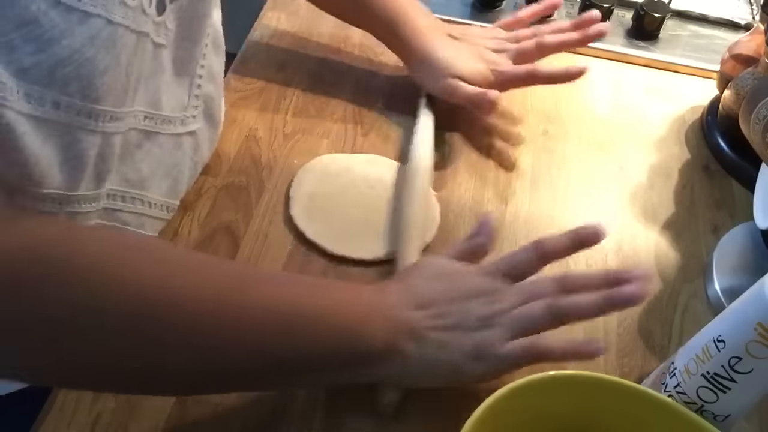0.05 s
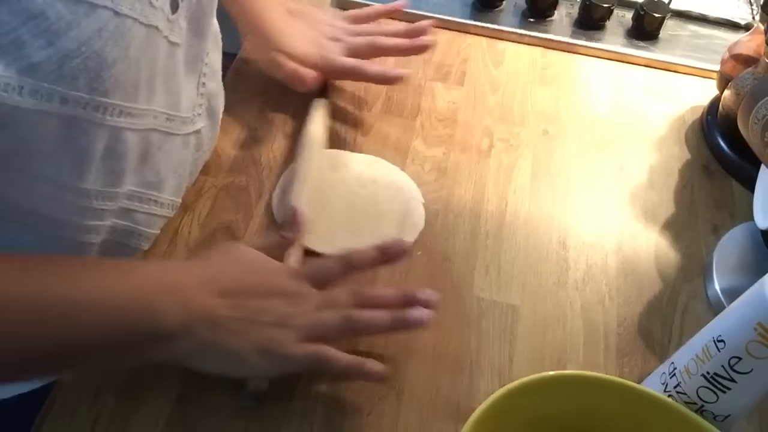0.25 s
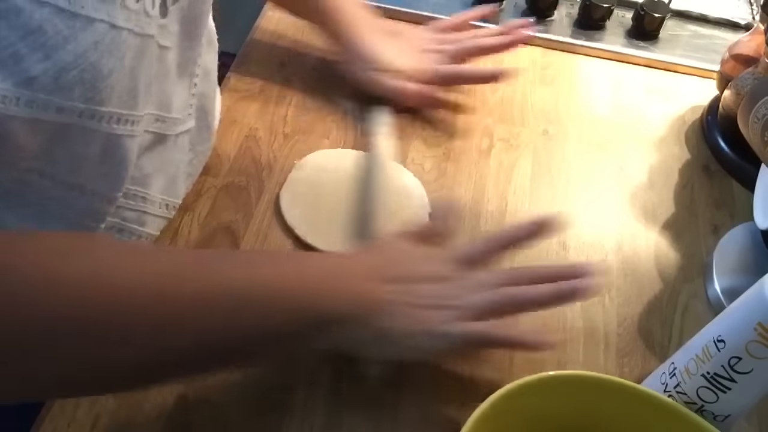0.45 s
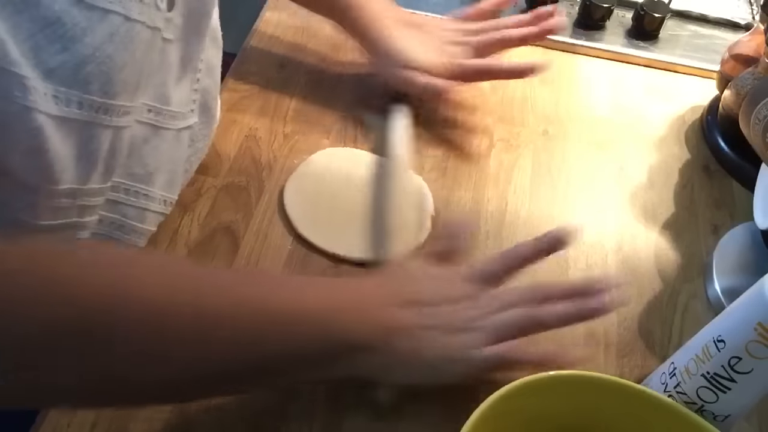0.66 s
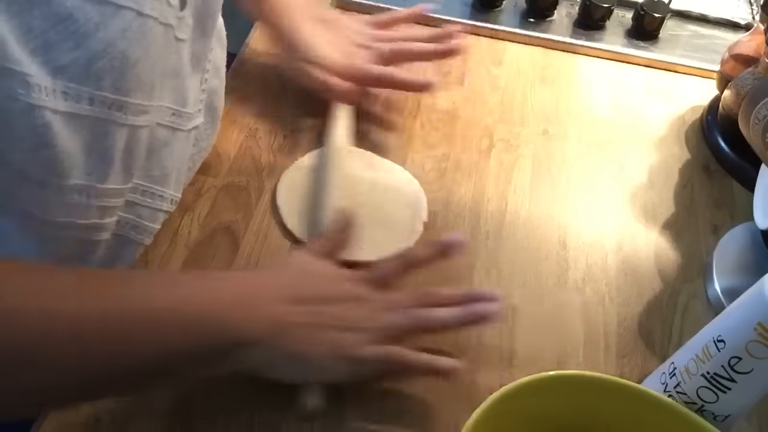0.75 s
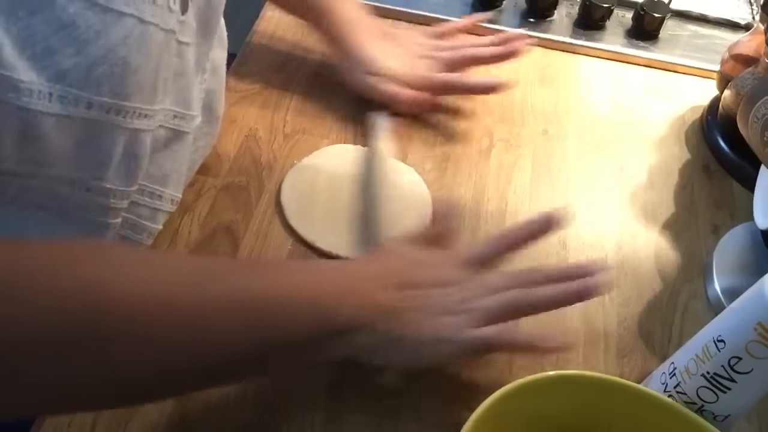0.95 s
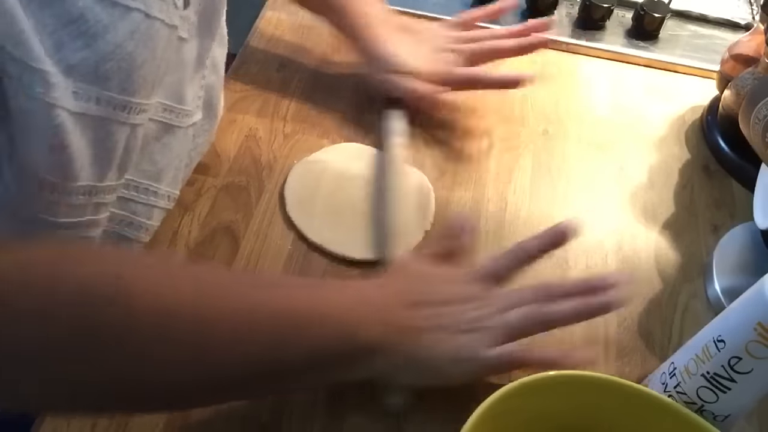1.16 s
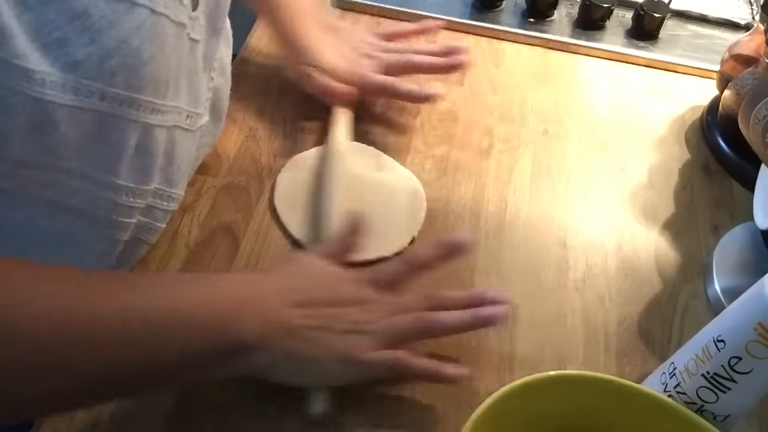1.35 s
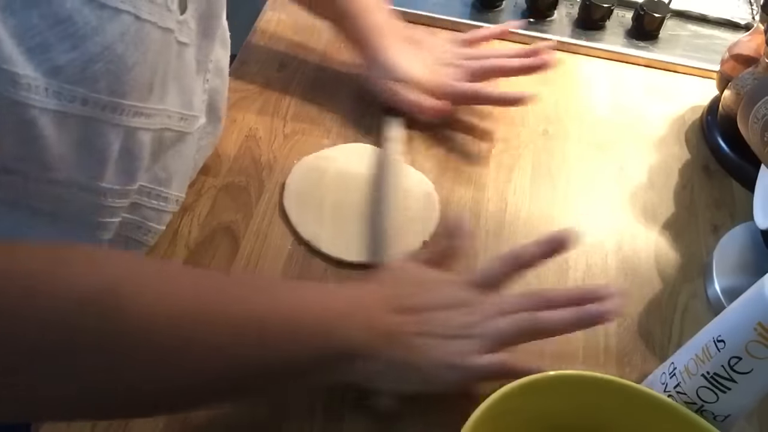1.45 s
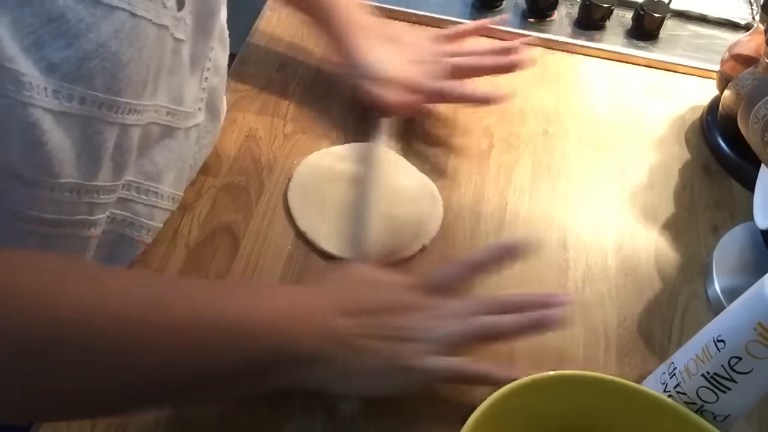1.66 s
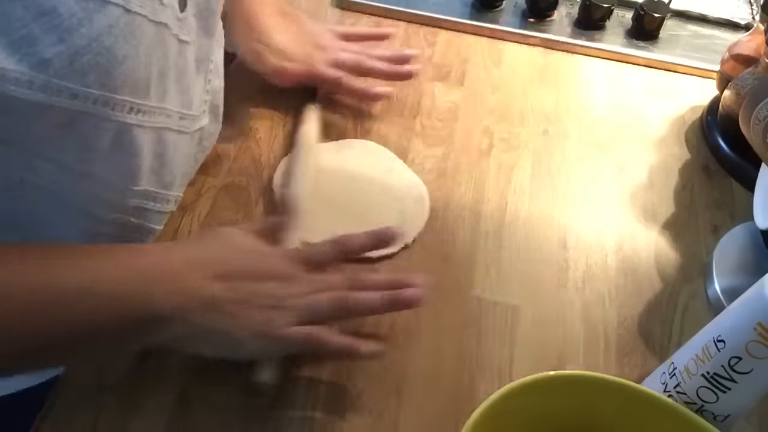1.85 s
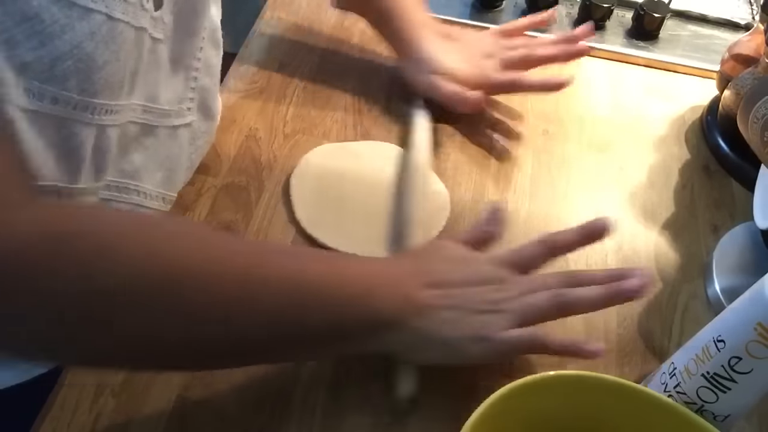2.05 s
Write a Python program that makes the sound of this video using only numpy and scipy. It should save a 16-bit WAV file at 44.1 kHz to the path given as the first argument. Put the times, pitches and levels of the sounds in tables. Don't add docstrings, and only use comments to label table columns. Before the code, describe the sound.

Rolling pin on dough: sharp wooden knocks, then softer ones, palms rubbing along the wood

```python
import sys
import numpy as np
from scipy import signal
from scipy.io import wavfile

SR = 44100
rng = np.random.default_rng(int(sys.argv[2]) if len(sys.argv) > 2 else 0)


def boost(x):
    u = np.asarray(x, float) / 20
    return 10 ** u


def put_to_file(sound):
    columns = np.atleast_2d(sound).T
    safe = np.clip(columns, -1, 1)
    whole_steps = np.round(safe * 32767)
    wavfile.write(sys.argv[1], SR, whole_steps.astype(np.int16))


N = 92610

# (time [s], pin level [dB], board level [dB], crack level [dB], chatter length [s])
KNOCKS = [
    (-.07, -29, -37, 9, 0.006),
    (.2107, -23.5, -33.5, 2, 0.0015),
    (.4834, -17, -30.5, -10, 0.00076),
    (.7652, -36, -30, -28, 0.019),
    (1.0595, -35.5, -34.5, -6.5, 0.014),
]
# (delay [s], level on bare wood [dB], level through dough [dB])
REBOUNDS = [(.008, -43, -21.5), (.026, -24, -15.5), (0.047, -37, -65)]
# (frequency [Hz], time to fade by 60 dB [s])
PIN_MODES = [(1005, 0.04), (1600, 0.021), (1800, 0.013), (2000, 0.014), (2480, 0.0096), (2790, 0.014),
             (2980, 0.016), (3290, 0.018), (3780, 0.018), (4020, 0.013), (5220, 0.011), (5670, 0.019),
             (6850, 0.0062), (7450, .012)]
# (frequency [Hz], time to fade by 60 dB [s])
BOARD_MODES = [(150, 0.32), (203, 0.27), (255, 0.14), (350, 0.086), (425, 0.11), (505, 0.17), (575, 0.085),
               (865, 0.1), (1340, 0.037)]
PIN_SHARE = [(-9.5, -4.5, -12, -5), (-0.5, -1, -4.5, -1.5), (6, 4, -18, -2.5), (4.5, 2.5, -7.5, -4.5),
             (4.5, -6, 2.5, 1.5), (3.5, 0.5, 1, -3), (4.5, -0.5, -2.5, -3.5), (-11, -18, -10.5, -16),
             (0, -6.5, -4, -6), (-26, -4, -6, -9), (-8, -9.5, -15, -41), (-4, -17.5, -5.5, -10),
             (-6, -40, -15, -16), (-6.5, -41, -14, -26)]
BOARD_SHARE = [(-12, -13, -19, -48), (-3, -6.5, -4.5, -3.5), (-4.5, -2.5, -8.5, -5), (4, 2.5, 3.5, -8.5),
               (5, 6.5, -2.5, 5.5), (-0.5, -1.5, -2.5, 1.5), (5.5, 7.5, 2, 6.5), (5.5, 2, 11, 11.5),
               (-20, -26, -14, -16)]
# (time [s], level [dB], pitch [Hz], time to fade by 60 dB [s])
THUDS = [(.003, -51, 95, 0.067), (0.083, -77, 100, 0.06), (.108, -72.5, 670, .08),
         (1.288, -46, 43.6, 0.035), (1.37, -69.5, 640, 0.044), (1.735, -69, 199, 0.15),
         (1.863, -49.5, 144, 0.03), (1.861, -57.5, 393, 0.013), (1.959, -54.5, 374, 0.027),
         (1.959, -56.5, 574, 0.015), (1.979, -53, 175, 0.041), (2.04, -72, 51.6, 0.071)]
# (middle [s], length [s], hiss level [dB], pin ring level [dB])
STROKES = [(.01, 0.27, -65, -87), (0.241, 0.15, -55.5, -82), (0.528, 0.19, -60, -60),
           (0.793, 0.18, -57.5, -71), (1.064, 0.23, -67.5, -66.5), (1.274, 0.087, -104, -62.5),
           (1.309, 0.28, -70.5, -70.5), (1.52, 0.33, -68, -76), (1.796, 0.34, -65.5, -71),
           (1.987, 0.083, -77, -65.5), (2.063, .22, -66, -69.5)]
# (frequency [Hz], level per Hz [dB])
RUB_HISS = [(150, -1), (350, 7), (700, -5), (1300, -1.5), (2700, -6.5), (5500, -11.5), (9000, -18),
            (15500, -17.5)]
# (frequency [Hz], level [dB])
RUB_MODES = [(2480, 1), (2640, -1), (2810, -1), (3050, -7.5), (3500, -4.5), (3780, -4), (4010, 0.5),
             (5250, -16.5), (5600, 0.5), (6890, -4)]
# (frequency [Hz], time to fade by 60 dB [s], echo level [dB])
KITCHEN = [(100, 0.22, -3.5), (417, 0.3, -1.5), (975, 0.32, 0.5), (1850, 0.29, -1), (3900, 0.25, -6),
           (6700, 0.27, -4.5), (13000, 0.33, 4.5)]
# (frequency [Hz], level per Hz [dB])
AIR = [(15, -37), (25, -5), (69, 2.5), (359, -7.5), (722, -12), (2560, -13), (4870, -14), (5430, -13),
       (15500, -26.5)]

LEAD = 4410

SOFT_FROM_S = .006
CONTACTS_PER_S, CHATTER_DB = (1500, 3500), (-12.5, 0.5)
PUSH_S, SOFT_ATTACK_S = (0.00051, 0.0005), .0025
RING_SHARE = (0.91, 0.69)
KNOCK_ECHO_DB, BOARD_ECHO_DB = (1.5, -1.5), -4


def at_hz(points, hz):
    points = np.array(points)
    return np.interp(np.log(hz), np.log(points[:, 0]), points[:, 1])


def rms_one(x):
    return x / np.sqrt(np.mean(x ** 2) + 1e-20)


def filtered(x, order, hz, kind):
    return signal.sosfilt(signal.butter(order, hz, kind, fs=SR, output="sos"), x)


def drift(rate_hz):
    r = np.exp(-80 * np.pi * rate_hz / SR)
    slow = signal.lfilter([1], [1, -2 * r, r * r], rng.standard_normal(N // 40 + 2002))
    slow = slow[2000:]
    return np.interp(np.arange(N) / 40, np.arange(len(slow)), rms_one(slow))


def ring(clicks, hz, t60):
    r = boost(-60 / (t60 * SR))
    w = 2 * np.pi * hz / SR
    return signal.lfilter([0, np.sin(w)], [1, -2 * r * np.cos(w), r * r], clicks + 1e-18)


def ring_body(force, modes, shares, spot, ring_share):
    out = 0
    for k, ((hz, t60), share_db) in enumerate(zip(modes, shares)):
        sign = (-1) ** k
        out = out + sign * boost(share_db[spot]) * ring(force, hz, t60 * ring_share)
    return out


def bands(size):
    edges = 22 * 2 ** np.arange(0, 9.6, .5)
    white = rng.standard_normal((2, size))
    return [(np.sqrt(low * high), filtered(white[k % 2], 2, [low, high], "band"))
            for k, (low, high) in enumerate(zip(edges, edges[1:]))]


def hiss(spectrum, flicker_db):
    return rms_one(sum(boost(at_hz(spectrum, hz) + flicker_db * drift(15)) * band for hz, band in bands(N)))


def knock_forces(chatter_s, soft):
    span = SR // 2
    t = np.arange(span) / SR
    hits = rng.random(span) < CONTACTS_PER_S[soft] / SR
    touch = hits * rng.uniform(-1, 1, span) * np.exp(-(t / chatter_s) ** (1 + 2 * soft))
    touch *= boost(CHATTER_DB[soft])
    if soft:
        touch *= 1 - np.exp(-t / SOFT_ATTACK_S)
    touch[0] = 1 - soft
    push = t * np.exp(-t / PUSH_S[soft]) / (PUSH_S[soft] ** 2 * SR)
    first = np.array([touch, push])
    force = first.copy()
    for delay_s, *level_db in REBOUNDS:
        lag = int(delay_s * SR)
        force[:, lag:] += boost(level_db[soft]) * first[:, :span - lag]
    return force


def crack(touch):
    fade = np.exp(-np.arange(800) / SR / 0.0018)
    burst = filtered(rng.standard_normal(800) * fade, 2, [1500, 5190], "band")
    return signal.fftconvolve(touch, burst)[:len(touch)]


def knocks():
    out = np.zeros(N + LEAD + SR)
    for n, (s, pin_db, board_db, crack_db, chatter_s) in enumerate(KNOCKS):
        soft = int(chatter_s > SOFT_FROM_S)
        spot = max(n - 1, 0)
        touch, push = knock_forces(chatter_s, soft)
        pin = ring_body(touch, PIN_MODES, PIN_SHARE, spot, RING_SHARE[soft])
        board = ring_body(push, BOARD_MODES, BOARD_SHARE, spot, RING_SHARE[soft])
        pin = boost(pin_db - 7.5) * (pin + boost(crack_db + 8) * crack(touch))
        pin = filtered(pin, 3, 7660, "low")
        board = boost(board_db - 4.5) * board
        echo = boost(KNOCK_ECHO_DB[soft]) * kitchen(pin + boost(BOARD_ECHO_DB) * board)
        i = int(s * SR) + LEAD
        out[i:i + len(pin)] += pin + board + echo
    return filtered(out[:N + LEAD], 4, 135, "high")


def thuds():
    out = np.zeros(N + LEAD)
    for s, db, hz, t60 in THUDS:
        push = np.zeros(N + LEAD)
        push[int(s * SR) + LEAD] = boost(db + 8.5)
        out += ring(filtered(push, 1, [0.74 * hz, 1.3 * hz], "band"), hz, t60)
    return out


def rub():
    t = np.arange(N) / SR
    hiss_gain, ring_gain = np.zeros(N), np.zeros(N)
    for middle, length, hiss_db, ring_db in STROKES:
        swell = np.cos(np.pi * np.clip((t - middle) / length, -.5, .5)) ** 2
        hiss_gain += boost(hiss_db) * swell
        ring_gain += boost(ring_db) * swell
    grain_size = boost(2.0 * np.minimum(rng.exponential(1, N), 3))
    grains = (rng.random(N) < 4000 / SR) * grain_size * rng.choice([-1, 1], N)
    dealt = rng.integers(0, 4, N)
    rung = np.zeros(N)
    for k, (hz, db) in enumerate(RUB_MODES):
        rung += boost(db + 2.5 * drift(12)) * ring(grains * (dealt == k % 4), hz, t60=0.019)
    return hiss_gain * hiss(RUB_HISS, flicker_db=1.5) + ring_gain * rms_one(rung)


def kitchen(x):
    t = np.arange(SR // 2) / SR
    rows = np.array(KITCHEN)
    tail = np.zeros(len(t))
    for hz, band in bands(len(t)):
        tail += band * boost(at_hz(rows[:, ::2], hz) - 60 * t / at_hz(rows, hz))
    tail *= 1 - np.exp(-(t / .0035) ** 2)
    return signal.fftconvolve(x, tail / np.sqrt(np.sum(tail ** 2)))[:len(x)]


def air():
    return boost(-70) * hiss(AIR, flicker_db=.8)


def scene():
    soft = thuds()
    wet = knocks() + soft + boost(-4) * kitchen(soft)
    return (wet[LEAD:] + rub() + air())[None]


def roll_off(x):
    return signal.sosfilt(signal.butter(12, 15670, fs=SR, output="sos"), x)


def record(dry):
    mix = filtered(dry, 2, 39, "high")
    return roll_off(mix)


dry = scene()
out = record(dry)
put_to_file(out)
```